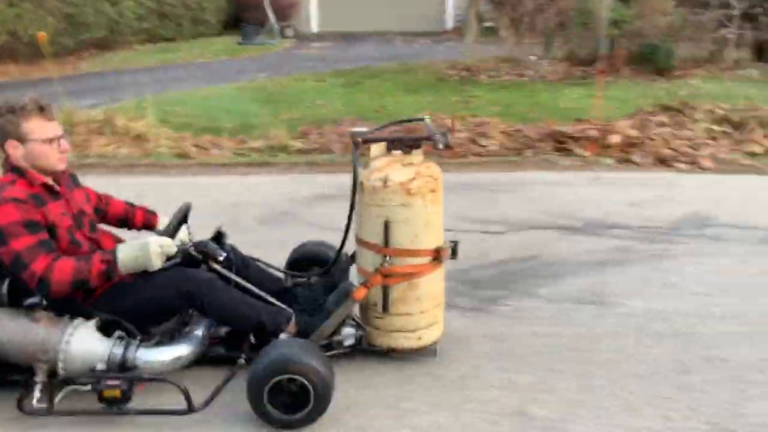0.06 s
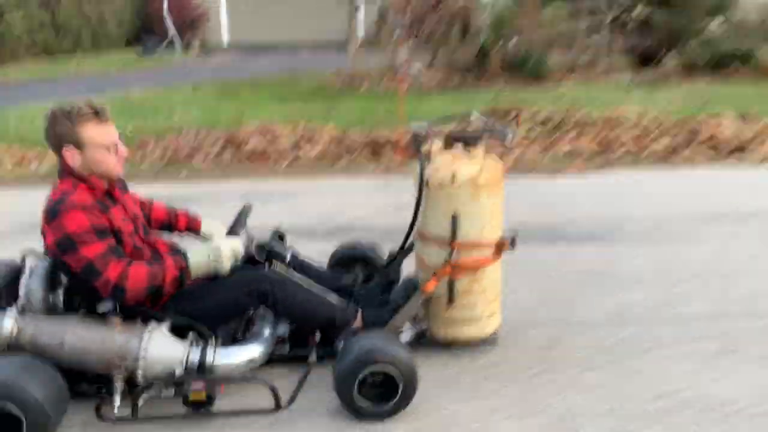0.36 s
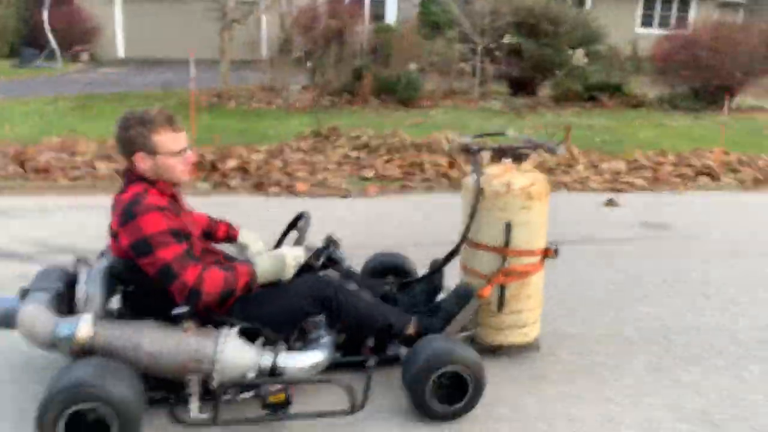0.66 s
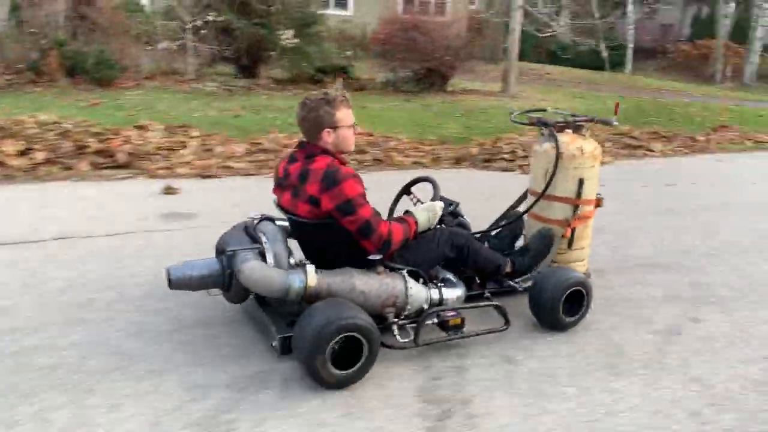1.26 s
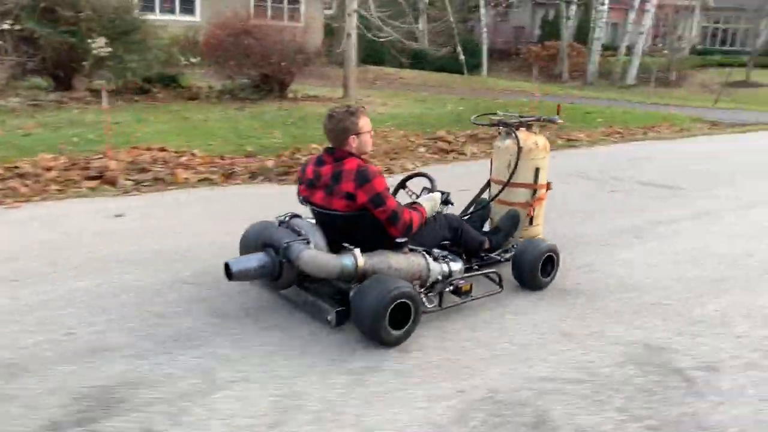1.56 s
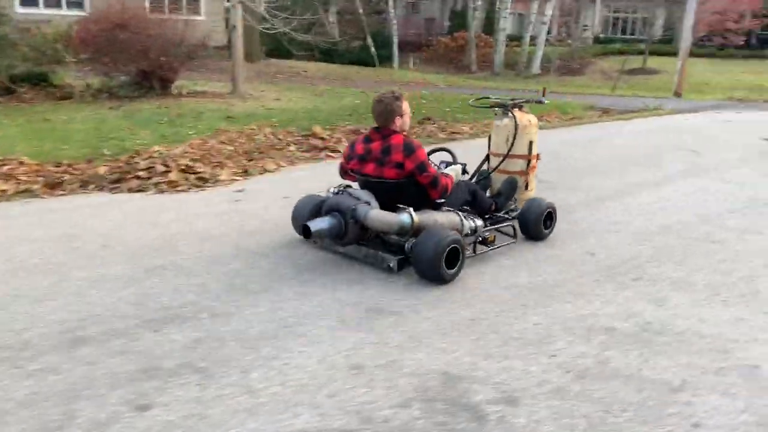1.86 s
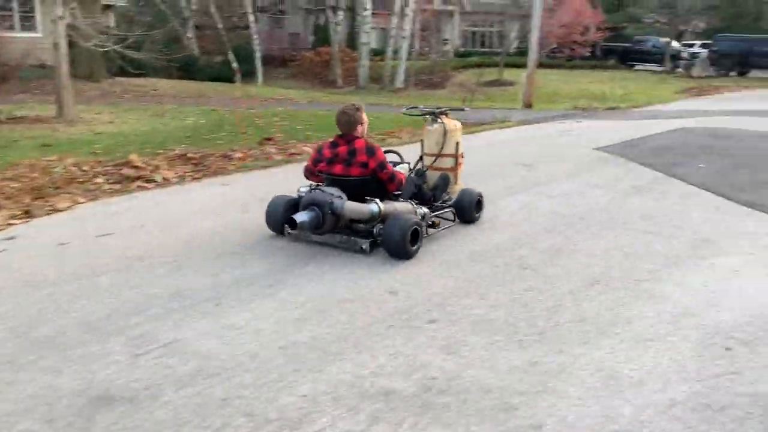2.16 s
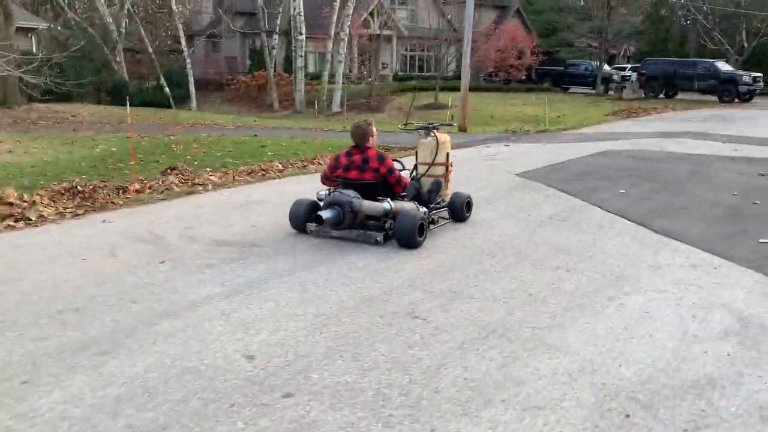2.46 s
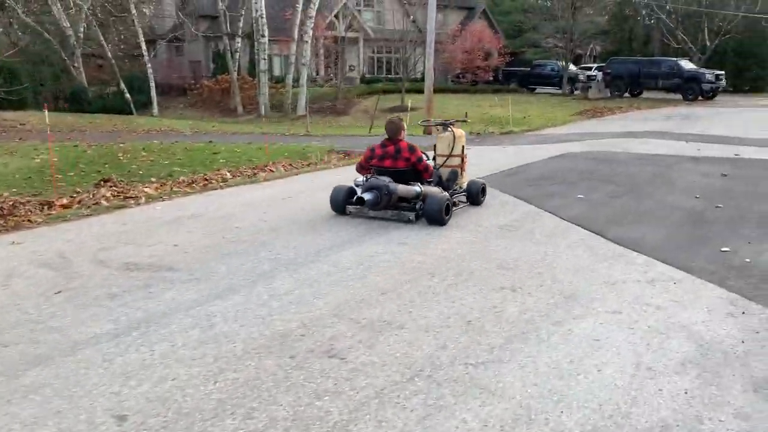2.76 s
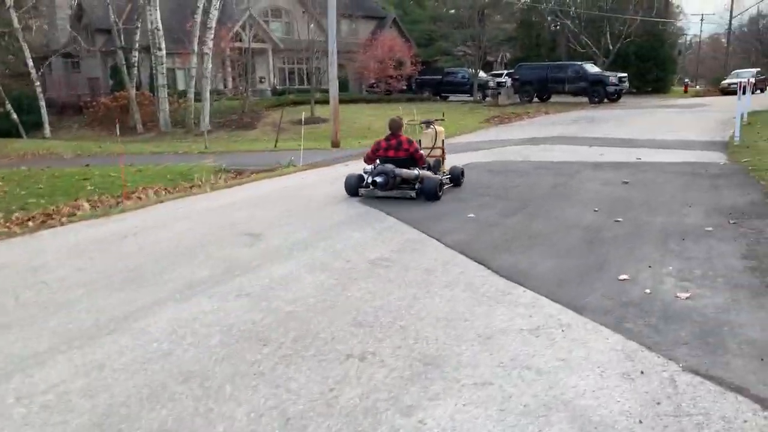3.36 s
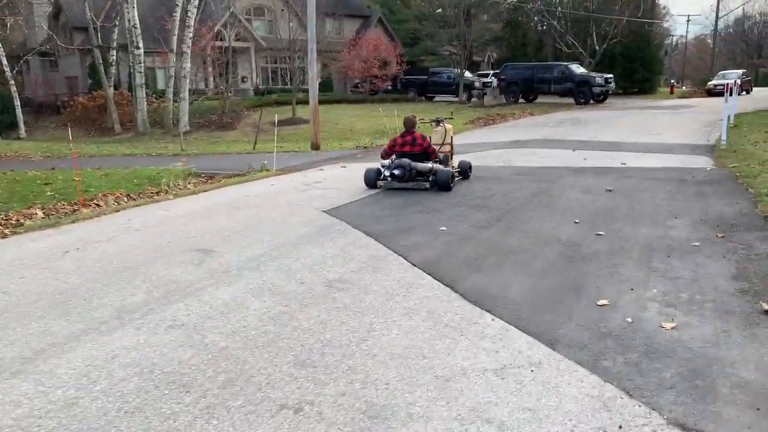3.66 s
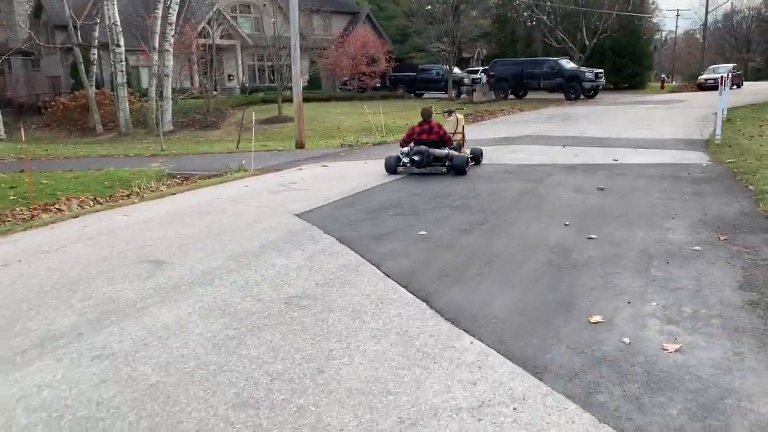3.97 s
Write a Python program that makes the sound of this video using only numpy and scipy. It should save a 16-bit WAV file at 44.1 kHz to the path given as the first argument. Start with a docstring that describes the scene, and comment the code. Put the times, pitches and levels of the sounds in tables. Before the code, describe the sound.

Jet-powered go-kart howls past with a high whine, fading into a lower roar.

```python
"""First comes the rush and howl of a small jet engine, as the go-kart it drives passes close by.
Its tyres drone, its burner rumbles, a little wind thuds on the microphone, and its spinning blades
whine, sinking slowly in pitch. As the kart rolls away down the street, the nozzle swings towards
the listener: there is a brief rasp, the hiss fades and the low roar of the jet takes over.
Two microphone openings hear the kart move from beside them to straight ahead."""
import sys
import numpy as np
from scipy import signal
from scipy.fft import rfft, irfft
from scipy.io import wavfile

SR = 44100
rng = np.random.default_rng(int(sys.argv[2]) if len(sys.argv) > 2 else 0)


def generate_wav(signal):
    """Clip the signal to [-1, 1] and save it as 16-bit WAV at the path in sys.argv[1]."""
    frames = np.transpose(np.atleast_2d(signal))
    scaled = np.clip(frames, -1, 1) * 32767
    pcm = np.round(scaled).astype(np.int16)
    wavfile.write(sys.argv[1], SR, pcm)


N = 176400
TIME = np.arange(N) / SR


def from_db(db):
    """Turn decibels into a number to multiply a sound by."""
    return 10 ** (np.asarray(db) / 20)


def rms_one(x):
    """Scale a signal to an average power of 1."""
    return x / np.sqrt(np.mean(x ** 2) + 1e-20)


def at_time(table, seconds=TIME):
    """Read a table at the given times, joining its points with straight lines."""
    return np.interp(seconds, *np.transpose(table))


def loudness(table):
    """Turn a table of levels into a volume for every sample."""
    return from_db(at_time(table))


def at_hz(table, hz):
    """Read a table at the given frequencies, with every octave equally wide."""
    known, values = np.transpose(table)
    return np.interp(np.log(hz + 1e-9), np.log(known), values)


def drift(rate_hz):
    """A smooth random wobble of about plus or minus 1; a higher rate wobbles faster."""
    step, warm_up = 40, 2000  # one value every 40 samples; the first 2000 values are dropped
    pole = np.exp(-2 * np.pi * rate_hz * step / SR)
    noise = rng.standard_normal(N // step + warm_up + 2)
    slow = signal.lfilter([1], [1, -2 * pole, pole * pole], noise)[warm_up:]
    return np.interp(np.arange(N) / step, np.arange(len(slow)), rms_one(slow))


def turbulence(colour, flutter_db, flutter_hz):
    """Two noises, direct and scattered, fluttering together. The colour sets their low-to-high mix."""
    hz = np.maximum(np.arange(N // 2 + 1) * SR / N, 1)
    octaves_outside = np.abs(np.log2(hz / np.clip(hz, colour[0][0], colour[-1][0])))
    gain = from_db(at_hz(colour, hz) - 13 * octaves_outside)  # 13 dB less per octave past the table
    noise = irfft(rfft(rng.standard_normal((2, N))) * gain, N)
    return rms_one(noise * from_db(flutter_db * drift(flutter_hz)))


def rough_tone(phase, width_hz):
    """A tone smeared into a narrow band of noise, as a direct and a scattered sound."""
    return np.array([rms_one(drift(width_hz) * np.cos(phase) + drift(width_hz) * np.sin(phase))
                     for _ in range(2)])


# How loud the rushing air is: (time [s], level [dB])
RUSH_LEVEL = [(0.0, -24.5), (0.4, -22), (0.8, -23.5), (1.3, -21.5), (1.6, -24), (1.9, -23), (2.15, -25),
              (2.6, -28.5), (3.1, -32.0), (3.6, -36), (4.0, -41)]
# Its bright colour: (frequency [Hz], relative level [dB])
RUSH_COLOUR = [(1500.0, -21.5), (2000.0, 0), (2270.0, -9), (2600.0, -3), (2850.0, 0.5), (3150.0, -0.5),
               (3550.0, -5.5), (4050.0, -12.5), (5000.0, -14.5), (5500.0, -22), (6300.0, -23),
               (8000.0, -49)]
def duct_rush():
    """Air rushes through the engine's duct."""
    return loudness(RUSH_LEVEL) * turbulence(RUSH_COLOUR, flutter_db=1.0, flutter_hz=55)


# How loud the noise of the howl is: (time [s], level [dB])
HOWL_LEVEL = [(0, -28), (.3, -24), (.7, -20.5), (1, -19), (1.4, -21), (1.9, -21.5), (2.1, -24.5),
              (2.5, -26.5), (2.85, -35.5), (4, -37.5)]
# Its colour, strongest near the pipe's note: (frequency [Hz], relative level [dB])
HOWL_COLOUR = [(700.0, -41), (1100.0, -18.5), (1500.0, -9), (1670.0, -7), (1790.0, -3), (1890.0, -3.5),
               (2020.0, -19.5), (2300.0, -28.5)]
def pipe_howl(note_hz=1821, note_db=-6):
    """Gas howls through the jet pipe, which rings at its main note."""
    ring = from_db(note_db) * rough_tone(2 * np.pi * note_hz * TIME, width_hz=66)
    return loudness(HOWL_LEVEL) * (ring + turbulence(HOWL_COLOUR, flutter_db=0.6, flutter_hz=40))


# How loud the hiss is: (time [s], level [dB])
HISS_LEVEL = [(0.0, -29.5), (0.5, -27.5), (0.9, -29), (1.35, -28), (1.75, -32), (2.1, -39.5), (2.7, -43),
              (3.3, -46.5), (4.0, -53)]
# Its very broad colour: (frequency [Hz], relative level [dB])
HISS_COLOUR = [(300.0, 0.5), (1000.0, -1.5), (2300, -10), (3800.0, -14), (4700.0, -10), (5400.0, -15),
               (6200.0, -5.5), (7200.0, -18.5), (9500.0, -21), (12400.0, -20), (13500, -25), (15500.0, -40)]
def intake_hiss():
    """Air hisses as it is sucked into the engine."""
    return loudness(HISS_LEVEL) * turbulence(HISS_COLOUR, flutter_db=1.15, flutter_hz=38)


# How loud the tyres are: (time [s], level [dB])
TYRE_LEVEL = [(0, -35.5), (.8, -36), (1.3, -46), (2.2, -58)]
# Their colour, with two low peaks: (frequency [Hz], relative level [dB])
TYRE_COLOUR = [(150, -18), (245, -0.5), (310, -4.5), (400, -21), (560, -5), (660, -20)]
def tyre_drone():
    """The small tyres drone on the asphalt while the kart is close."""
    return loudness(TYRE_LEVEL) * turbulence(TYRE_COLOUR, flutter_db=0.8, flutter_hz=18)


# How loud the rumble is: (time [s], level [dB])
RUMBLE_LEVEL = [(0, -36.5), (.35, -35.5), (.6, -31), (.9, -28), (1.15, -31.5), (1.7, -32), (2.2, -33.5),
                (3, -33.5), (4, -37.5)]
# Its deep colour: (frequency [Hz], relative level [dB])
RUMBLE_COLOUR = [(30.0, -25), (60.0, -19.5), (110.0, -5), (175.0, 2.5), (240.0, -2.5), (310.0, -15),
                 (600.0, -21)]
def burner_rumble():
    """Fuel burning inside the engine makes a low rumble."""
    return loudness(RUMBLE_LEVEL) * turbulence(RUMBLE_COLOUR, flutter_db=0.8, flutter_hz=14)


# Puffs of wind: (time of peak [s], spread to each side [s], level [dB])
GUSTS = [(0.09, 0.055, -37), (0.383, 0.24, -45), (0.597, 0.017, -33.5), (0.78, 0.055, -41),
         (1.3, 0.42, -51)]
# Their very deep colour: (frequency [Hz], relative level [dB])
WIND_COLOUR = [(25, -24), (50, 2.5), (75, 3), (130, -13)]
def wind_gusts():
    """Short gusts thud on the microphone."""
    force = sum(from_db(db) * np.exp(-.5 * ((TIME - peak) / spread) ** 2) for peak, spread, db in GUSTS)
    return force * turbulence(WIND_COLOUR, flutter_db=0.5, flutter_hz=18)


# How loud the duct's note is: (time [s], level [dB])
DUCT_LEVEL = [(0, -40), (.28, -31), (.5, -29), (.9, -29), (1.4, -50), (4, -71)]
def duct_note(note_hz=2795):
    """The air in a duct rings at one pitch while the intake is near."""
    return loudness(DUCT_LEVEL) * rough_tone(2 * np.pi * note_hz * TIME, width_hz=45)


# Shaft speed as heard, with the pitch shift of a moving source: (time [s], speed [turns per s])
SHAFT_SPEED = [(0, 778.5), (.8, 777.3), (1.15, 775.6), (1.55, 772.6), (2.1, 769), (3.0, 766.3),
               (3.4, 763.5), (4, 757.5)]
# The compressor's whine, rising and falling sharply: (time [s], level [dB])
WHINE_LEVEL = [(0, -41), (.24, -39.5), (.32, -50), (.44, -38), (.49, -46), (.54, -28.5), (.58, -35),
               (.63, -27), (.79, -27), (.88, -41), (.95, -51), (1.13, -36), (1.3, -58), (1.45, -38),
               (1.66, -36), (1.78, -47), (2.3, -54), (2.43, -49), (2.55, -55), (3.05, -55), (3.5, -61),
               (4, -64)]
# The tone an octave above it, strongest beside the intake: (time [s], level [dB])
OCTAVE_LEVEL = [(0, -59), (.3, -51), (.7, -64), (1.5, -76), (2.2, -78), (4, -89)]
# The turbine's whistle, heard from behind and to the side: (time [s], level [dB])
WHISTLE_LEVEL = [(0, -70), (1.1, -63), (1.5, -53), (1.8, -58), (2.2, -71), (2.5, -66), (3, -78), (4, -88)]
def spinning_blades(compressor_blades=8, turbine_blades=11):
    """One humming shaft turns two bladed wheels; each sings at the rate its blades go by."""
    shaft_angle = 2 * np.pi * np.cumsum(at_time(SHAFT_SPEED)) / SR
    blade_phase = compressor_blades * shaft_angle
    # Hot, moving air makes the direct whine waver, and its scattered part is smeared.
    waver_hz, waver_radians, waver_db = 12, .35, 2.2
    direct = np.sin(blade_phase + waver_radians * drift(waver_hz)) * from_db(waver_db * drift(waver_hz))
    scattered = rough_tone(blade_phase, waver_hz)[1]
    whine = loudness(WHINE_LEVEL) * np.array([rms_one(direct), scattered])
    # A rough edge around the whine stays 24.5 dB below the intake hiss.
    rough_edge = from_db(-24.5) * loudness(HISS_LEVEL) * rough_tone(blade_phase, width_hz=59)
    octave = loudness(OCTAVE_LEVEL) * rough_tone(2 * blade_phase, width_hz=40)
    whistle = loudness(WHISTLE_LEVEL) * rough_tone(turbine_blades * shaft_angle, width_hz=14)
    hum = from_db(-44) * rough_tone(shaft_angle, width_hz=3.7)
    return whine + rough_edge + octave + whistle + hum


# How loud the sizzle is: (time [s], level [dB])
SIZZLE_LEVEL = [(0, -47), (0.9, -43.5), (1.3, -39.5), (1.7, -42), (2.1, -50), (4, -68)]
# Its thin, high colour: (frequency [Hz], relative level [dB])
SIZZLE_COLOUR = [(13300, -32), (14500, -3), (15400, 0), (16000, -2)]
def gas_sizzle():
    """The flowing gas sizzles faintly in the highest treble."""
    return loudness(SIZZLE_LEVEL) * turbulence(SIZZLE_COLOUR, flutter_db=1.3, flutter_hz=40)


# The harsh colour of the rasp: (frequency [Hz], relative level [dB])
RASP_COLOUR = [(1900, -2), (2300, 2.5), (3000, 1), (3900, 0), (4600, -12), (8400, -30), (10000, -26)]
def nozzle_rasp(peak_s=1.86, spread_s=0.11, peak_db=-26):
    """The jet beams a rasp backwards and sideways; it sweeps over the listener as the kart turns."""
    beam = np.exp(-.5 * ((TIME - peak_s) / spread_s) ** 2)
    return from_db(peak_db) * beam * turbulence(RASP_COLOUR, flutter_db=3.5, flutter_hz=56)


# How loud the roar is: (time [s], level [dB])
ROAR_LEVEL = [(0, -37), (1, -33), (1.7, -30), (2.05, -27.5), (2.5, -24), (2.9, -27), (3.4, -27.5),
              (4, -28.5)]
# Its low colour: (frequency [Hz], relative level [dB])
ROAR_COLOUR = [(260, -32), (310, -16.5), (370, -3.5), (450, -0.5), (530, -3), (640, -8.5), (790, -6),
               (920, -9.5), (1080, -18.5)]
def nozzle_roar():
    """Gas roars out of the nozzle, loudest once it points towards the listener."""
    return loudness(ROAR_LEVEL) * turbulence(ROAR_COLOUR, flutter_db=1.27, flutter_hz=28)


# How loud the mixing noise is, swelling late: (time [s], level [dB])
MIXING_LEVEL = [(0, -44), (2, -38.5), (2.5, -31), (2.95, -27.5), (3.4, -25.5), (4, -29.5)]
# Its mid-range colour: (frequency [Hz], relative level [dB])
MIXING_COLOUR = [(400, -3.5), (600, -3.5), (880, 3.5), (1300, -2.5), (1800, 1), (2150, -37), (3500, -22),
                 (4900, -26.5), (5500, -40)]
def jet_mixing():
    """The fast jet churns as it mixes with the air behind the kart."""
    return loudness(MIXING_LEVEL) * turbulence(MIXING_COLOUR, flutter_db=1.4, flutter_hz=15)


# The lowest pitch the road's echo weakens, mostly rising with distance: (time [s], frequency [Hz])
ROAD_DIP = [(0, 660), (1, 495), (1.6, 760), (2.2, 1160), (2.7, 1200), (3.2, 2300), (4, 2650)]
def road_bounce(sound, strength=0.14, dull_above_hz=4800):
    """Add a dull echo off the asphalt, which follows more closely as the kart moves away."""
    hz, seconds, spectra = signal.stft(sound, SR, nperseg=1024)
    hz = hz[:, None]
    delay_s = 0.5 / at_time(ROAD_DIP, seconds)
    echo = strength / (1 + (hz / dull_above_hz) ** 2) * np.exp(-2j * np.pi * hz * delay_s)
    return signal.istft(spectra * (1 + echo), SR)[1][:, :N]


# Where the kart is: (time [s], direction [0 beside to 1 straight ahead])
DIRECTION = [(0, 0), (.7, 0.084), (1.4, 0.26), (1.8, 0.53), (2.3, 0.63), (2.7, 0.88), (4, 1)]
# The left side's head start for a sound beside, half-way round and ahead: (frequency [Hz], lead [rad])
LEAD_BESIDE = [(150, 0.34), (750, 0.94), (1000, 1.74), (1300, 3.4), (1600, 4.4), (1850, 7.5), (2400, 9.18),
               (3400, 9.5), (4200, 11.6), (4900, 12.6), (5500, 8.8), (6200, 12.2)]
LEAD_HALFWAY = [(250, 0.18), (1150, 0.92), (1450, -1.5), (1800, -0.4), (2200, 0), (2600, 1.86),
                (3500, 0.98), (5000, 2.2), (5500, 1), (6200, 7)]
LEAD_AHEAD = [(250, 0), (420, .5), (650, -0.1), (1150, 0.65), (1500, -1.5), (2000, 0.6), (2700, 0.44),
              (3200, -0.5), (4900, -1.5), (5500, -2), (6200, -1.5)]
# How alike the two sides sound: (frequency [Hz], likeness [0 to 1])
LIKENESS = [(70, 0.92), (180, 1), (500, 1), (1200, 0.96), (1900, 0.99), (3200, 0.78), (4500, 0.86),
            (6300, 0.87), (7300, 0.05)]
# How much louder the left side is: (frequency [Hz], left minus right [dB])
BALANCE = [(250, 0.35), (450, 1.8), (620, -1.2), (900, 1.5), (1250, 6.5), (1550, 6.5), (1850, 6.5),
           (2000, 5.5), (2250, -4), (2850, 3), (3600, -2.5), (5000, 0.5), (5750, -2), (6400, 0)]
# The pitch the right side hears poorly: (direction [0 beside to 1 straight ahead], frequency [Hz])
DEAF_SPOT = [(0, 1850), (.2, 1510), (.5, 1400), (1, 1310)]
def microphone_pair(sound):
    """Two openings hear the kart as left and right, with timing and balance set by its direction."""
    hz, seconds, (direct, scattered) = signal.stft(sound, SR, nperseg=1024)
    hz = hz[:, None]
    ahead = np.clip(at_time(DIRECTION, seconds), 0, 1)
    # Blend the head starts of the two nearest directions.
    lead = np.angle(sum(np.maximum(1 - np.abs(2 * ahead - k), 0) * np.exp(1j * at_hz(table, hz))
                        for k, table in enumerate((LEAD_BESIDE, LEAD_HALFWAY, LEAD_AHEAD))))
    alike = np.clip(at_hz(LIKENESS, hz), 0, 1)
    tilt = from_db(at_hz(BALANCE, hz))
    direct = np.sqrt((1 + alike) / (1 + tilt ** 2)) * direct
    scattered = np.sqrt((1 - alike) / (1 + tilt ** 2)) * scattered
    # The deaf spot is deepest, 10 dB down, when the kart is a third of the way round.
    octaves_away = np.log2((hz + 1) / np.interp(ahead, *np.transpose(DEAF_SPOT)))
    deaf_db = -10 * np.exp(-(octaves_away / 0.27) ** 2 - ((ahead - 0.33) / 0.56) ** 2)
    left = tilt * (direct + scattered)
    right = from_db(deaf_db) * np.exp(-1j * lead) * (direct - scattered)
    return signal.istft(np.array([left, right]), SR, nperseg=1024)[1][:, :N]


def scene():
    """The gas noises echo off the road and reach the microphone with the tyres, wind and blades."""
    engine = duct_rush() + pipe_howl() + intake_hiss() + burner_rumble() + duct_note() + gas_sizzle()
    jet = nozzle_rasp() + nozzle_roar() + jet_mixing()
    return microphone_pair(road_bounce(engine + jet) + tyre_drone() + wind_gusts() + spinning_blades())


def record(dry):
    """Fade both ends very quickly and cut off the highest treble."""
    fade_s, cutoff_hz = .004, 15900
    from_edge_s = np.minimum(TIME, TIME[::-1])
    fade = np.sin(np.pi / 2 * np.minimum(from_edge_s / fade_s, 1)) ** 2
    treble_cut = signal.ellip(10, .05, 60, cutoff_hz, fs=SR, output="sos")
    return signal.sosfilt(treble_cut, dry * fade)


dry = scene()
out = record(dry)
generate_wav(out)
```